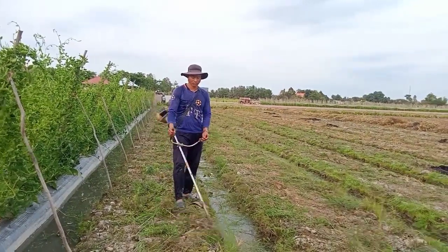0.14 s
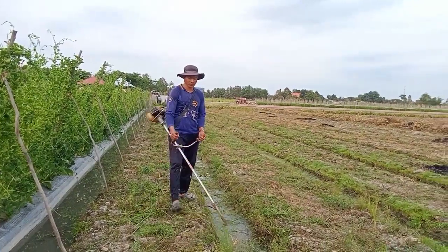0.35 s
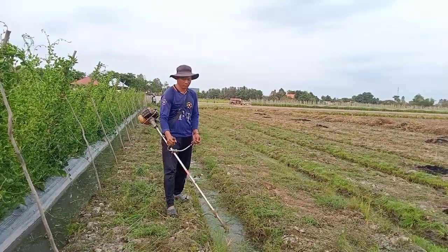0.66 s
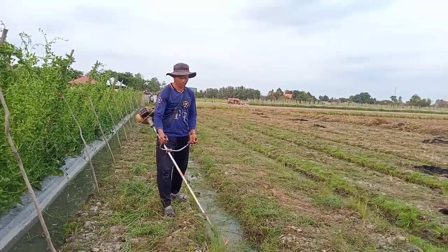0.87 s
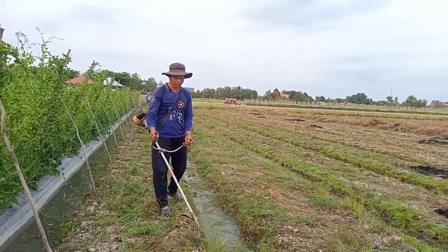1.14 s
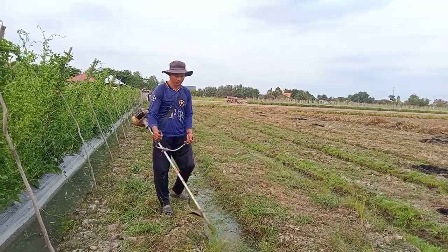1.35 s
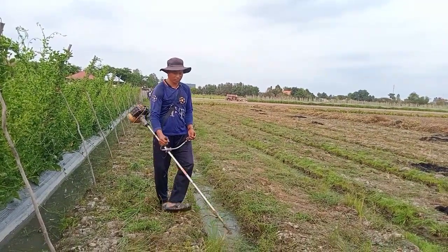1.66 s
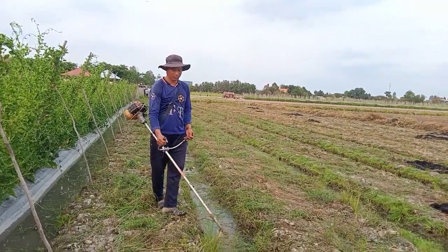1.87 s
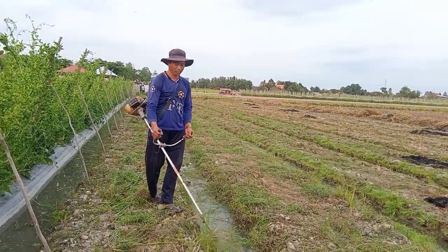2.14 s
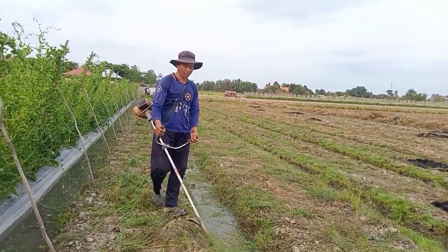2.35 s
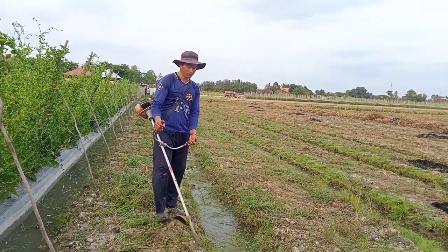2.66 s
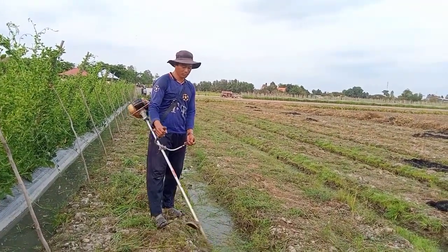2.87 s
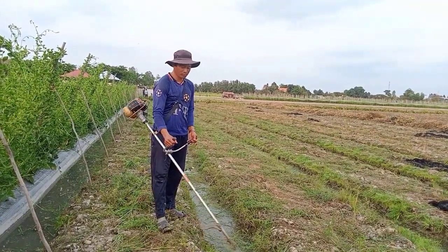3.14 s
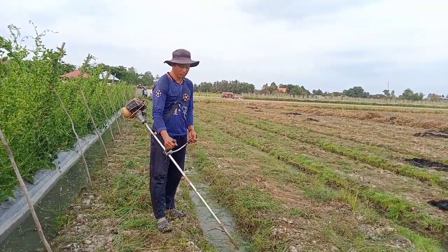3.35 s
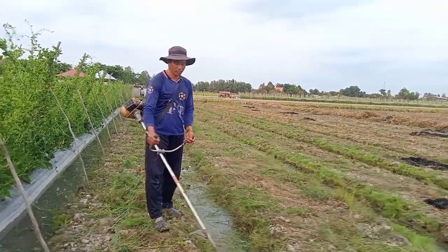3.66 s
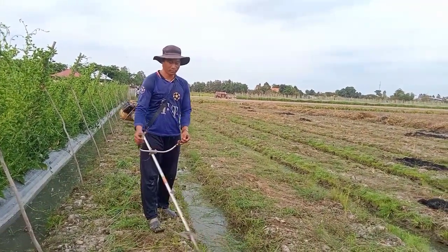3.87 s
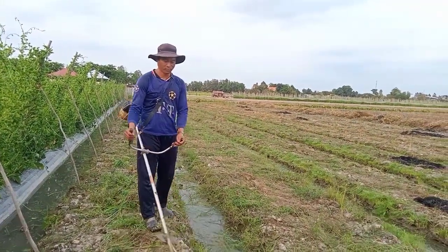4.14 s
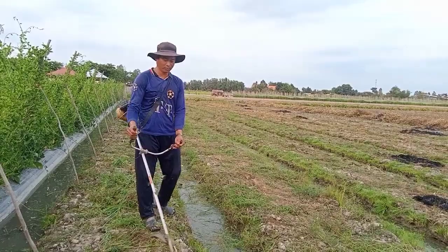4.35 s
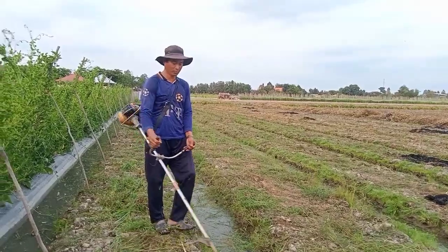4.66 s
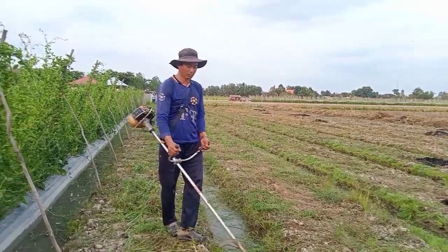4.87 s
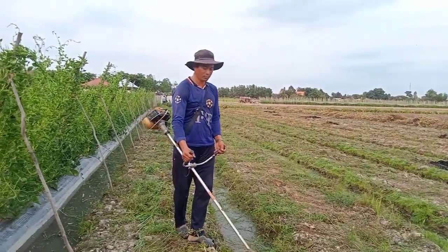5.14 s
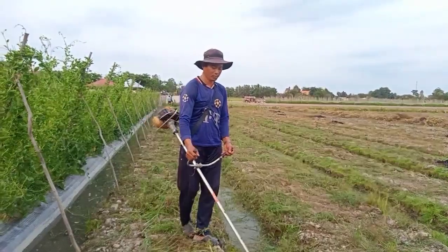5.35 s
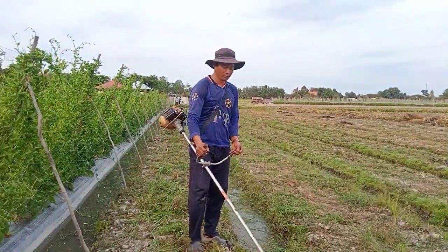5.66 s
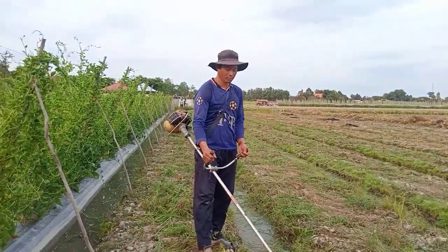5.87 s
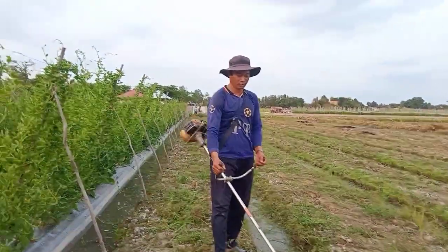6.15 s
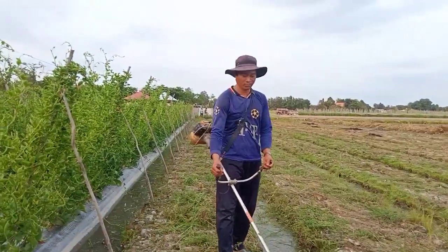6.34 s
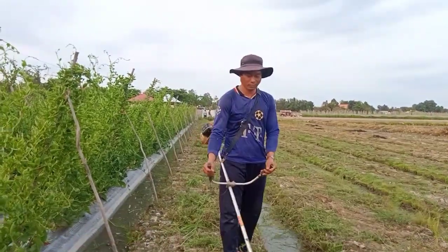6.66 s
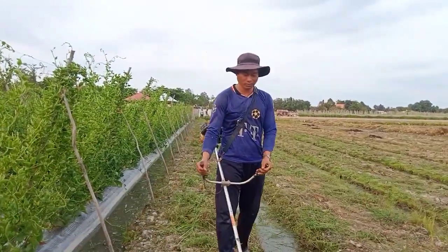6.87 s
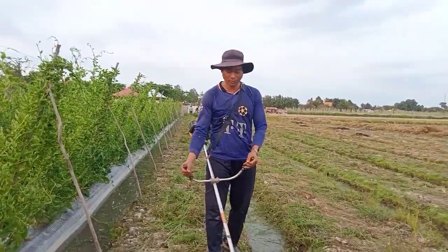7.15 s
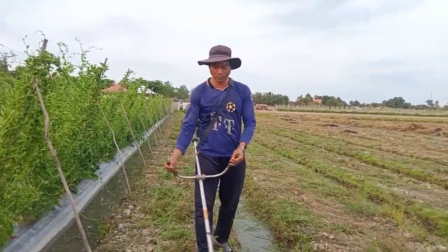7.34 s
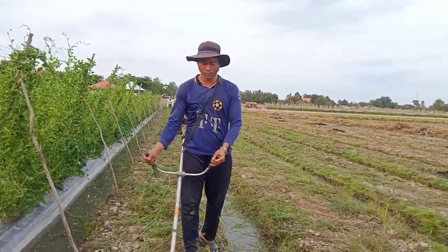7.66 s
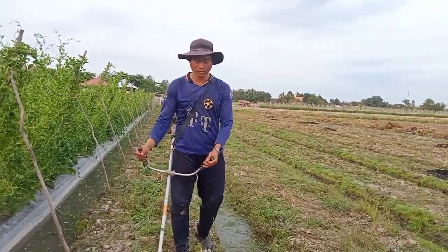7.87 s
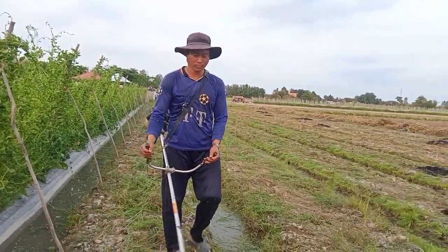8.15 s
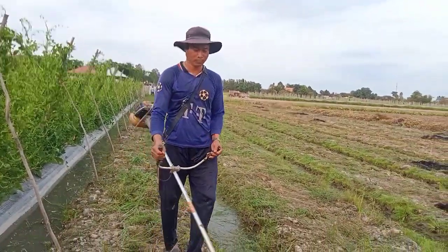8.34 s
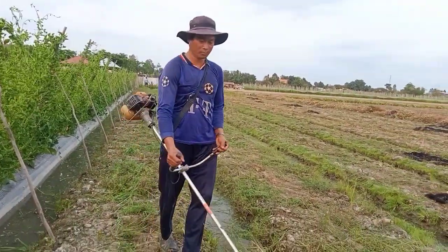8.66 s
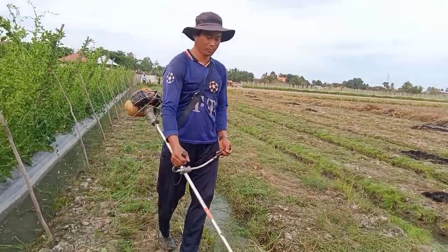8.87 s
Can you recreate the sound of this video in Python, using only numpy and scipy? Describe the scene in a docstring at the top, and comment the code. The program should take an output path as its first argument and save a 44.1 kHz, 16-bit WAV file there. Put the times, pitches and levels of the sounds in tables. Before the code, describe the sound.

A petrol brush cutter runs throughout at an open field edge, a few metres away and slowly nearing. Its engine is a hollow, rasping drone whose speed wavers slightly and whose tone shifts with each swing. The steel blade swishes through grass over a soft, airy rush. At about 2.4 seconds the blade clangs several times on grit and the engine sags, recovering by around 4 seconds. Rapid, small, high zings flutter in the engine sound, strongest near 3 to 3.5 and 5 to 5.5 seconds. More ringing scrapes and a stone click come around 4 seconds, then sharp cracks, clicks and a brief squeal at 5.3 to 5.6. From 6.5 to 8 seconds the blade repeatedly scrapes soil, with metallic ringing, short high squeals and flung stones clicking. Plain mowing then resumes, the engine slightly faster and louder toward 9 seconds.

```python
"""A four-stroke petrol brush cutter works along a field edge, a few metres away and slowly nearing.
Its exhaust fires about 79 times a second, booming, barking, ringing and sagging under load; short,
falling zings come about every third firing, in step with its burble. The steel blade swishes through
grass, scrapes the soil twice a turn, squeals, clangs on grit and flings stones. Behind it are an airy
rush and the engine's echoes off the ground, a raised bed and vines."""
import sys
import numpy as np
from scipy import signal
from scipy.fft import rfft, irfft
from scipy.io import wavfile

SR = 44100
rng = np.random.default_rng(int(sys.argv[2]) if len(sys.argv) > 2 else 0)


def int16_out(signal):
    """Quantize to a 16-bit WAV file."""
    q = np.round(np.clip(np.atleast_2d(signal).T, -1, 1) * 32767)
    wavfile.write(sys.argv[1], SR, q.astype(np.int16))


N = 397341
TIME = np.arange(N) / SR

# Engine speed, sagging as the blade bites. Each row: time in seconds, firings per second.
ENGINE_SPEED = [(0.0, 78.5), (0.27, 78.6), (0.75, 79.8), (1.36, 78.3), (1.65, 80.0), (2.01, 79.4),
                (2.36, 78.0), (2.56, 74.8), (3.01, 75.7), (3.11, 76.7), (3.54, 77.9), (4.12, 77.7),
                (4.89, 80.5), (5.19, 80.3), (5.54, 78.7), (6.05, 79.4), (6.42, 78.9), (6.62, 77.5),
                (7.48, 79.2), (7.68, 77.9), (8.81, 81.7), (9.01, 80.9)]
def brush_cutter():
    """The firings set the blade's pace; the zings keep their own rate, each on the nearest firing."""
    speed, = curves(ENGINE_SPEED)
    turns = np.cumsum(speed * (1 + .001 * wander(14))) / SR  # running count of firings
    tips = turns * 18 / 13  # running count of blade tips passing, through the gear head
    engine = outdoors(exhaust(turns, speed) + second_arrival(turns) + airy_rush(turns)) + hum(turns)
    blade = grass(tips) + soil(tips) + squeals(tips) + strikes() + stones()
    return engine + blade + zings(turns)


# Each swing turns the muffler out from behind the worker, lifts it and hides it again.
# Each row: time in seconds, boom level in dB, bark level in dB, lag of the ground echo in ms.
SWING = [(0.0, -57, -34, 1.83), (0.22, -42.5, -34, 1.68), (0.6, -37.5, -32.5, 2), (0.9, -39.5, -30.5, 2.04),
         (1.2, -45.5, -32, 1.82), (1.85, -37.5, -32.5, 2.03), (2.4, -43, -32, 1.97), (2.75, -45, -34, 2.1),
         (3.25, -35.5, -41.5, 2.35), (3.6, -38, -35.5, 2.16), (4.2, -50, -37, 1.93), (4.85, -39, -34, 2.16),
         (5.5, -42, -34.5, 1.81), (6.2, -40.5, -34, 2.7), (6.8, -45, -29.5, 2.45), (7.6, -43.5, -42, 2.71),
         (8.35, -40.5, -30, 2.72), (8.85, -33, -30.5, 2.9), (9.01, -35, -30.5, 3.1)]
# The outlet's midrange bark. Each row: frequency in Hz, level in dB.
BARK_TONE = [(600.0, -44.5), (790.0, -5.5), (880.0, -0.5), (1030.0, -17.5), (1130.0, 1.0), (1280.0, -5.5),
             (1430.0, 5.5), (1580.0, 8), (1750.0, -6.5), (1950.0, -4.5), (2200.0, -14), (2450.0, -20.5),
             (3300.0, -41.5), (5000.0, -78)]
def exhaust(turns, speed):
    """Each firing thumps the muffler, then leaves the outlet as a bark and a rasp."""
    boom_db, bark_db, _ = curves(SWING)
    flutter = np.sin(2 * np.pi * flutter_cycles())  # stronger and weaker firings
    firing = pulses(turns, uneven_db=.4, jitter_ms=.012)
    boom = aimed(muffler(turns, firing, flutter))
    bark = colour(firing + .05 * puffs(turns, length=.15, between=.02, uneven_db=1.5), BARK_TONE)
    return gain_of(boom_db) * boom + gain_of(bark_db) * bark + rasp(turns, speed, firing, flutter)


# The pace of the exhaust's flutter. Each row: time in seconds, cycles per second.
FLUTTER_RATE = [(0, 26), (1.9, 24.7), (3.6, 24.2), (4.3, 26), (4.8, 30.8), (5.2, 30.8), (5.55, 26.4),
                (5.9, 30.6), (6.4, 30.6), (8.45, 25), (8.7, 36.8)]
def flutter_cycles():
    """Running count of the flutter of uneven firing, about one cycle in three firings."""
    rate, = curves(FLUTTER_RATE)
    return np.cumsum(rate) / SR


# The muffler's hollow boom and its burble. Each row: frequency in Hz, level in dB.
BOOM_TONE = [(250.0, -48.5), (325.0, -33), (390.0, 4), (475.0, -0.5), (555.0, 4), (640.0, 8.5),
             (715.0, -9.5), (850.0, -8.5), (960.0, 0.5), (1100.0, -4.5), (1400.0, -68.5)]
BURBLE_TONE = [(250, -34), (370, -11.5), (500, -1), (600, -6.5), (720, -2.5), (1000, -58)]
def muffler(turns, firing, flutter):
    """The muffler booms at each firing and burbles with the flutter, more when the zings are loud."""
    gas = puffs(turns, length=.2, between=.03, uneven_db=2)
    boom = colour(gain_of(.8 * flutter) * firing + .03 * gas, BOOM_TONE)
    burble_db = -7.5 + .13 * (zing_level() - ZING_IDLE_DB)
    return boom + colour(gain_of(burble_db) * evened(flutter * firing), BURBLE_TONE)


# The drone's focus. Each row: time in seconds, dB added to the resonance and taken from the rest.
FOCUS = [(0, 3.5), (1.2, 3), (2.2, 1.5), (2.6, -2), (3.2, 1.5), (5.5, -1.5), (8, 1.5), (8.8, 4.5)]
def aimed(boom, resonance_hz=604, width_hz=100):
    """The muffler's main resonance stands out of the boom when the outlet faces the listener."""
    focus_db, = curves(FOCUS)
    drone = signal.lfilter(*signal.iirpeak(resonance_hz, resonance_hz / width_hz, SR), boom)
    return gain_of(focus_db) * drone + gain_of(-focus_db) * (boom - drone)


# The jet's bright edge. Each row: frequency in Hz, level in dB.
RASP_TONE = [(1500, -5), (2350, 1), (2550, 14), (2740, 18), (3020, -4.5), (3230, 17.5), (3450, -14),
             (3650, 1), (3900, 13.5), (4100, -4), (4400, -4.5), (4800, -5.5), (6500, -41), (9000, -28.5)]
# The worker's body shades the outlet.
# Each row: middle in seconds, half width in seconds, loss in dB (a negative loss lifts the rasp).
BODY_SHADOWS = [(4.33, 0.44, 1.5), (7.6, 0.28, -1.5)]
def rasp(turns, speed, firing, flutter, cruise_hz=79, db_per_hz=2.5, start_m=6.5, walk_m_per_s=.12):
    """The exhaust jet rasps louder as the engine speeds up and the worker walks closer."""
    near_db = -20 * np.log10(1 - walk_m_per_s * TIME / start_m)
    shadow_db = sum(db * np.exp(-((TIME - s) / width) ** 2) for s, width, db in BODY_SHADOWS)
    level_db = -38.5 + db_per_hz * (speed - cruise_hz) + near_db - shadow_db
    jet = gain_of(4 * flutter) * puffs(turns, length=.5, between=.3, uneven_db=1.5)
    return gain_of(level_db) * evened(colour(evened(jet) + .45 * firing, RASP_TONE))


# The engine's low body. Each row: multiple of the firing rate, level in dB.
HUM_ORDERS = [(1, -44), (3, -45.5)]
def hum(turns):
    """Low harmonics of the firing rate hum almost steadily."""
    orders = sum(gain_of(db) * evened(np.cos(2 * np.pi * k * turns)) for k, db in HUM_ORDERS)
    return orders * gain_of(.12 * wander(5))


# The second arrival. Each row: time in seconds, level in dB, lag behind the firing in ms.
ARRIVAL = [(0.0, -35.5, 1.9), (0.5, -40, 2.13), (0.92, -31.5, 1.93), (1.3, -40, 1.96), (1.65, -33.5, 2.02),
           (2.0, -39.0, 1.97), (2.3, -32.5, 1.97), (2.7, -38.5, 1.96), (3.0, -33, 2.18), (3.4, -41, 2.2),
           (4.1, -38, 1.9), (4.38, -45, 1.98), (4.7, -37, 2.035), (5.5, -33, 2.1), (6.1, -33.5, 2.1),
           (7.3, -32.5, 1.83), (8.05, -37, 2.12), (8.35, -37, 1.8), (9.0, -32, 2.1)]
# Its bright ring. Each row: frequency in Hz, level in dB.
ARRIVAL_TONE = [(700.0, -46), (1100.0, -29), (1500.0, -2.5), (1750.0, -6.5), (1880.0, 3), (2000.0, 3.5),
                (2120.0, -4), (2330.0, -18), (2900.0, -49.5), (3900.0, -22.5), (4600.0, -38),
                (7000.0, -45.5)]
def second_arrival(turns):
    """A bright, ringing pulse about 2 ms after each firing swells and fades as the machine swings."""
    level_db, lag_ms = curves(ARRIVAL)
    main_pulse = pulses(turns, uneven_db=.7, jitter_ms=.012)
    late_tick = pulses(turns - .34, uneven_db=2, jitter_ms=.08)
    noise = puffs(turns, length=.2, between=.04, uneven_db=1.2)
    ringing = colour(main_pulse + .2 * late_tick + .13 * noise, ARRIVAL_TONE)
    return gain_of(level_db + 3) * delayed(ringing, lag_ms)


# The partials of a zing. Each row: frequency in Hz, level in dB, seconds to fade by 60 dB.
ZING_PARTIALS = [(2713, 11.5, 0.032), (2890, -7, 0.025), (3220, 0, 0.046), (3900, 2, 0.042),
                 (4170, -13, 0.019), (4420, -3, 0.025), (4640, -3, 0.03), (5000, -10, 0.027),
                 (5530, -15, 0.03)]
def zings(turns, rise_s=.006, sag=.04, detune=.008, spread_db=1):
    """Short, falling zings near 2.7 kHz, about every third firing, in step with the exhaust's burble."""
    cycles, level_db, t = flutter_cycles(), zing_level(), TIME[:SR // 10]
    peaks = np.arange(1, int(cycles[-1])) + 1 / 4
    firings = np.round(np.interp(peaks, cycles, turns))
    sagging = t - sag * rise_s * np.exp(-t / rise_s)  # each zing starts a little sharp
    swell = 1 - np.exp(-(t / rise_s) ** 2)
    tones, fizz = np.zeros((2, N))
    for s in np.interp(firings, turns, TIME):
        size = gain_of(np.interp(s, TIME, level_db) + spread_db * rng.standard_normal())
        for hz, db, t60 in ZING_PARTIALS:
            sharper, phase, louder = rng.standard_normal(3)
            tone = np.sin(2 * np.pi * (hz * (1 + detune * sharper) * sagging + phase))
            add(tones, s, size * swell * gain_of(db + louder - 60 * t / t60) * tone)
        add(fizz, s, size * burst(decay_s=.015))
    return gain_of(-8) * tones + gain_of(-23) * colour(fizz, SWISH_TONE)


# Spells of louder or softer zings. Each row: start and length in seconds, level in dB.
ZING_SPELLS = [(0.7, 0.31, -29), (1.17, 0.43, -25), (1.57, 0.28, -22), (1.94, 0.3, -19),
               (3.091, 0.53, -14.5), (3.73, 0.13, -20), (4.23, 0.11, -30), (4.814, .85, -19.5),
               (5.7, 0.71, -28), (8.2, 0.46, -42), (8.636, 0.29, -45)]
ZING_IDLE_DB = -32.5
def zing_level():
    """The strength of the zings, in dB: faint and steady between spells."""
    db = np.full(N, ZING_IDLE_DB)
    for start, length, spell_db in ZING_SPELLS:
        db[(TIME >= start) & (TIME < start + length)] = spell_db
    return db


# How hard the blade mows. Each row: time in seconds, level in dB.
GRASS_LEVEL = [(0, -36), (.25, -39), (1.4, -40.5), (2.38, -32.5), (2.65, -37.5), (4.1, -34.5), (4.7, -36.5),
               (5.45, -34), (6.4, -34.5), (9, -34.5)]
# The bright swish of stalks. Each row: frequency in Hz, level in dB.
SWISH_TONE = [(1000, -4), (2100, 21), (2420, 14.5), (2750, 14), (3450, 9), (3950, 14.5), (4400, 8.5),
              (5200, -3), (5500, -1), (5850, -5.5), (6550, -6), (7400, -18.5), (8200, -13), (9700, -25.5),
              (11800, -21), (13600, -9), (15300, -20), (16500, -50)]
def grass(tips):
    """Stalks snap at every pass of a blade tip, in uneven clumps."""
    swish_db, = curves(GRASS_LEVEL)
    snaps = puffs(tips, length=.4, between=.6, uneven_db=2.5)
    return gain_of(swish_db + 2 + 1.3 * wander(33)) * colour(snaps, SWISH_TONE)


# The blade drags on soil. Each row: start and length in seconds, then scrape, bell and rim levels in dB.
DRAGS = [(2.478, 0.063, -38, -20, -35), (3.683, 0.031, -36, -46, -32), (3.92, 0.25, -45, -27.5, -56),
         (4.241, 0.082, -37, -30, -42), (5.28, 0.046, -32, -24, -35), (6.55, 0.15, -29, -16, -33.5),
         (6.707, 0.046, -29, -27, -32), (6.757, 0.064, -37, -23, -28), (6.88, 0.054, -51, -19.5, -31),
         (7.21, 0.081, -33, -20.5, -31.5), (7.406, 0.021, -32, -20, -48), (7.494, 0.12, -33, -18.5, -55),
         (7.648, 0.11, -28.5, -19, -51), (7.766, 0.1, -39, -17, -52), (7.905, 0.042, -33, -20, -31)]
# The blade's low bell, its high shriek, and the rim that chatters when it digs in.
# Each row: frequency in Hz, level in dB, seconds to fade by 60 dB.
BELL_MODES = [(1163, -14, .25), (1351, -6, .3), (1402, -9, .15), (1458, 0, .25), (1508, -2, .2),
              (1550, -8, .1), (1872, -5, .2), (1960, -7, .1), (2089, -7, .15)]
SHRIEK_MODES = [(1930, -7, .02), (2160, -8, .1), (2850, -8, .04), (3194, -12, .1), (3525, -12, .14),
                (3880, -5, .06), (3980, 0, .12), (4050, -3, .09), (4125, -3, .1), (4355, -10, .15),
                (5179, -20, .14), (5389, -20, .12), (5600, -22, .07), (6080, -22, .05), (6500, -24, .05),
                (6780, -20, .06), (7100, -24, .04), (7750, -27, .05), (8190, -25, .06)]
RIM_MODES = [(3310, -14, .04), (3470, 2.5, 0.059), (3890, 8, 0.041), (4350, 8, 0.07)]
def soil(tips, grazing_db=-51):
    """The two tips scrape the ground in turn, one harder, and set the steel ringing."""
    scraping = tolling = gain_of(grazing_db)
    digging = 0
    for start, length, scrape_db, bell_db, rim_db in DRAGS:
        press = pressure(start, length)
        scraping = np.maximum(scraping, gain_of(scrape_db) * press)
        tolling = np.maximum(tolling, gain_of(bell_db) * press)
        digging = np.maximum(digging, gain_of(rim_db) * press)
    lopsided = 1 + .3 * np.sin(np.pi * tips)
    friction = puffs(tips, length=.35, between=.25, uneven_db=1.5)
    blows = pulses(tips - .4, uneven_db=1.5, jitter_ms=.02)
    scrape = evened(lopsided * (.9 * friction + blows))
    # each ring is driven only within its own band, so the scrape stays clear of high hiss
    shriek = ring(scraping * band(scrape, 1500, 8000), SHRIEK_MODES)
    bell = ring(tolling * band(scrape, 1000, 2600), BELL_MODES)
    rim_knocks = pulses(tips / 2, uneven_db=1.5, jitter_ms=.1)
    rim = ring(digging * band(rim_knocks, 2500, 5000), RIM_MODES)
    return spin(tips) * (shriek + gain_of(-9) * bell) + rim


def pressure(start, length, attack_s=.018, release_s=.027):
    """The blade digs in, holds and lifts away."""
    early, late = np.maximum(start - TIME, 0), np.maximum(TIME - start - length, 0)
    return np.exp(-early / attack_s - late / release_s)


def spin(tips, depth_db=3.5):
    """The ringing disc faces toward and away from the listener once a turn, so its tones throb."""
    return evened(gain_of(depth_db * np.sin(np.pi * (tips - .2))))


# The steel catches and sings. Each row: start and length in seconds, pitch in Hz, level in dB.
SQUEALS = [(0.096, .02, 4090, -40), (0.875, 0.037, 4080, -39.5), (2.5, 0.075, 4110, -36),
           (5.038, 0.029, 4120, -36.5), (5.31, 0.023, 4100, -29), (6.533, 0.044, 4360, -27),
           (6.56, 0.19, 5177, -41), (6.71, 0.057, 3980, -29), (6.755, 0.056, 3524, -29),
           (6.758, 0.045, 3977, -22.5), (6.765, 0.035, 4127, -26), (6.88, .03, 3524, -39),
           (6.882, 0.028, 3980, -29), (7.536, 0.074, 3980, -38), (7.65, 0.095, 3980, -29.5),
           (7.652, 0.1, 5400, -45), (7.66, .09, 5610, -50), (7.775, 0.059, 3990, -30),
           (7.903, 0.058, 4000, -25.5), (7.905, .05, 5400, -47)]
def squeals(tips, waver_hz=18):
    """The scraping tips lock a blade mode into a wavering tone, which throbs as the disc spins."""
    drift = np.cumsum(waver_hz * wander(60)) / SR
    tones = sum(gain_of(db) * pressure(s, length) * np.sin(2 * np.pi * (hz * TIME + drift))
                for s, length, hz, db in SQUEALS)
    return np.sqrt(2) * tones * spin(tips) * gain_of(1.5 * wander(45))


# Hits on coarse grit. Each row: start in seconds, level in dB, extra level for the clang in dB.
STRIKES = [(2.3635, -21, 9), (2.441, -20, 4), (2.4684, -18.5, 13), (2.5014, -14, 16.5), (2.511, -28, 20),
           (3.913, -21, 7), (3.9447, -22, 9.5), (5.2822, -16.5, -4), (5.2922, -20, -4), (5.3015, -12.5, -3),
           (5.3107, -24, 13), (5.5967, -22.5, -1), (6.5221, -18.5, 6), (6.5859, -13.5, 8),
           (6.769, -16.5, 4), (6.88, -17, -18), (7.1826, -21.5, 8), (7.2095, -19, 14.5), (7.2219, -13.5, 6),
           (7.314, -22.5, 12), (7.3996, -24, 13), (7.645, -21, -2), (7.701, -19, -4), (7.9008, -17, -12)]
# The dry crack of stone on steel. Each row: frequency in Hz, level in dB.
CRACK_TONE = [(200, -57), (1000, -44), (2000, 3), (3000, -4), (4200, -2.5), (4900, -7), (6100, -22),
              (6800, -24), (8200, -32.5), (10000, -30), (12000, -30), (13600, -17), (15300, -32),
              (16500, -39)]
# The struck blade's clang. Each row: frequency in Hz, level in dB, seconds to fade by 60 dB.
CLANG_MODES = [(1260, -39, 0.41), (1380, 9, 0.32), (1915, 17, 0.26), (2230, 10, 0.026), (2140, 23, 0.27),
               (2860, 8, 0.037), (3690, 0, 0.2), (4130, 6, 0.15), (3890, -8, 0.33), (4300, 6.5, 0.24),
               (6020, -6, 0.12), (6180, -5.5, 0.15)]
def strikes(shriek_db=18):
    """Grit cracks against the blade, which clangs and shrieks; crumbs spray after it."""
    crack, blow, tick = np.zeros((3, N))
    for s, db, clang_db in STRIKES + fine_grit():
        add(crack, s, gain_of(db - 7) * (burst(decay_s=.0022) + .87 * burst(decay_s=.026)))
        add(tick, s, gain_of([db + shriek_db]))
        add(blow, s, gain_of(db + clang_db - 33) * burst(decay_s=.0018))
        add(blow, s, gain_of([db + clang_db + 16.5]))
    clang = ring(band(blow, 1250, 7000), CLANG_MODES)
    shriek = ring(band(tick, 3000, 9000), SHRIEK_MODES)
    return colour(crack, CRACK_TONE) + clang + shriek


def fine_grit(count=8, per_s=22, spread_db=2, clang_db=-6):
    """Small strikes scattered through each drag, harder when it scrapes harder."""
    grains = []
    for start, length, scrape_db, *_ in DRAGS:
        delays = (np.arange(count) + rng.random(count)) / per_s
        levels = scrape_db + spread_db * rng.standard_normal(count)
        grains += [(start + s, db, clang_db) for s, db in zip(delays, levels) if s < length]
    return grains


# Small flying stones. Each row: start in seconds, level in dB.
STONES = [(4.105, -8), (5.328, -10), (5.4106, -9), (5.5127, -3.5), (6.632, 1), (7.209, 1), (7.2186, -6)]
def stones():
    """Each stone flung off the blade gives one dry, sharp click."""
    clicks = np.zeros(N)
    for s, db in STONES:
        add(clicks, s, gain_of([db]))
    return colour(clicks, CRACK_TONE)


# Level of the airy rush, stepping up near 2.4 s and then rising slowly.
# Each row: time in seconds, level in dB.
AIR_LEVEL = [(0, -38), (2.25, -35.5), (2.55, -33.5), (7, -31.5), (9, -30)]
# Its colour. Each row: frequency in Hz, level in dB.
AIR_TONE = [(20, -32), (45, -28), (70, -21), (110, 1), (150, -9), (210, -9), (320, -10), (500, -2),
            (740, -4), (950, -4.5), (1150, 4), (1300, -3), (1700, 0), (2000, 5.5), (2250, 4.5), (2500, -8),
            (5000, -49), (16000, -91)]
def airy_rush(turns):
    """A broad rush of air pulses gently with each firing."""
    level_db, = curves(AIR_LEVEL)
    air = puffs(turns, length=1, between=1, uneven_db=2.5)
    return gain_of(level_db + .27 * wander(3.2)) * colour(air, AIR_TONE)


# A low bed of noise. Each row: time in seconds, level in dB.
LOW_RUSH_LEVEL = [(0, -52), (1.9, -48), (2.3, -45), (2.5, -45.5), (8, -48.5), (9, -39.5)]
def low_rush():
    """A soft, low rush under the engine."""
    db, = curves(LOW_RUSH_LEVEL)
    return gain_of(db) * evened(band(rng.standard_normal(N), 175, 400))


def outdoors(x):
    """Echoes off the ground, the raised bed and the vines give the sound a hollow, shifting colour."""
    ground_ms = curves(SWING)[2]
    bed_ms = 4.42 + .127 * TIME  # the detour grows as the worker nears
    return x + .3 * delayed(x, ground_ms) + .14 * delayed(x, bed_ms) + vines(x)


def vines(x, count=24, detour_ms=(3, 16), drift_hz=1.5, level_db=-9.5):
    """Faint echoes off the vines fade in and out as the machine moves, filling gaps between firings."""
    bright, echoes = band(x, 950, 6000), np.zeros(N)
    for delay, rate, phase in rng.random((count, 3)):
        lag = round(np.interp(delay, [0, 1], detour_ms) * SR / 1000)
        fading = np.sin(2 * np.pi * (rate * drift_hz * TIME + phase))
        echoes[lag:] += (bright * fading)[:N - lag]
    return gain_of(level_db) * echoes * np.sqrt(2 / count)


def pulses(turns, uneven_db, jitter_ms):
    """One click a cycle, each a little different in size and timing."""
    at = np.interp(np.arange(1, int(turns[-1])), turns, np.arange(N))
    size, late = rng.standard_normal((len(at), 2)).T
    at = np.clip(at + late * jitter_ms * SR / 1000, 0, N - 2)
    whole, clicks = at.astype(int), np.zeros(N)
    clicks[whole] = gain_of(uneven_db * size) * (1 - at % 1)
    clicks[whole + 1] = gain_of(uneven_db * size) * (at % 1)
    return evened(clicks)


def puffs(turns, length, between, uneven_db):
    """A puff of noise each cycle, decaying over `length` of a cycle, on a steady floor of `between`."""
    size = gain_of(uneven_db * rng.standard_normal(N))[abs(turns).astype(int)]
    return evened((between + size * np.exp(-(turns % 1) / length)) * rng.standard_normal(N))


def burst(decay_s):
    """A short, dying crunch of noise."""
    t = TIME[:SR // 8]
    return rng.standard_normal(len(t)) * np.exp(-t / decay_s)


def wander(rate_hz):
    """A smooth random drift, mostly slower than this rate."""
    rolloff = 1 + (np.fft.rfftfreq(N, 1 / SR) / rate_hz) ** 4
    return evened(irfft(rfft(rng.standard_normal(N)) / rolloff, N))


def colour(x, spectrum, size=4096):
    """Causal filter of unit energy with the given spectral shape."""
    hz, db = np.transpose(spectrum)
    log_hz = np.log(abs(np.fft.fftfreq(size, 1 / SR)) + 1)
    log_gain = np.log(gain_of(np.interp(log_hz, np.log(hz), db)))
    minimum_phase = np.exp(np.conj(signal.hilbert(log_gain)))
    taps = np.fft.ifft(minimum_phase).real[:size // 2]
    return signal.oaconvolve(x, taps / np.linalg.norm(taps))[:N]


def ring(x, modes):
    """Drives decaying modes; each one's level sets its share of the energy."""
    t = TIME[:SR // 2]
    taps = sum(gain_of(db) * evened(np.sin(2 * np.pi * hz * t) * np.exp(-np.log(1000) * t / t60))
               for hz, db, t60 in modes)
    return signal.oaconvolve(x, taps / np.linalg.norm(taps))[:N]


def band(x, low_hz, high_hz):
    """Steep band-pass."""
    return signal.sosfilt(signal.butter(4, [low_hz, high_hz], "band", fs=SR, output="sos"), x)


def delayed(x, delay_ms):
    """The same sound over a longer path."""
    return np.interp(TIME - delay_ms / 1000, TIME, x)


def gain_of(db):
    """Decibels to amplitude."""
    return 10 ** (np.asarray(db) / 20)


def evened(x):
    """Scales to an rms of one."""
    return x / np.sqrt(np.mean(x ** 2) + 1e-20)


def curves(rows):
    """Each column of a time table, sample by sample."""
    s, *columns = np.transpose(rows)
    return [np.interp(TIME, s, c) for c in columns]


def add(mix, s, sound):
    """Mixes a sound in at s seconds."""
    part = mix[max(round(s * SR), 0):][:len(sound)]
    part += sound[:len(part)]


def scene():
    """The brush cutter over a low rush, in mono."""
    return (brush_cutter() + low_rush())[None]


def record(dry):
    """Cuts the treble above 15.6 kHz."""
    low_pass = signal.firwin(511, 15600, window=("kaiser", 9), fs=SR)
    return signal.oaconvolve(dry, low_pass[None], "same")


dry = scene()
out = record(dry)
int16_out(out)
```